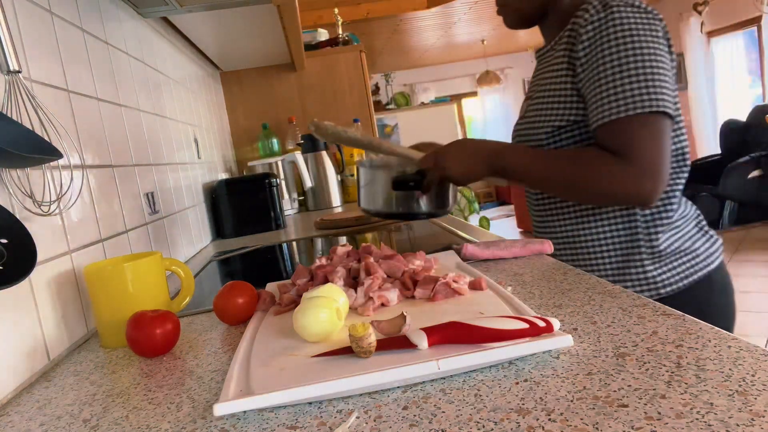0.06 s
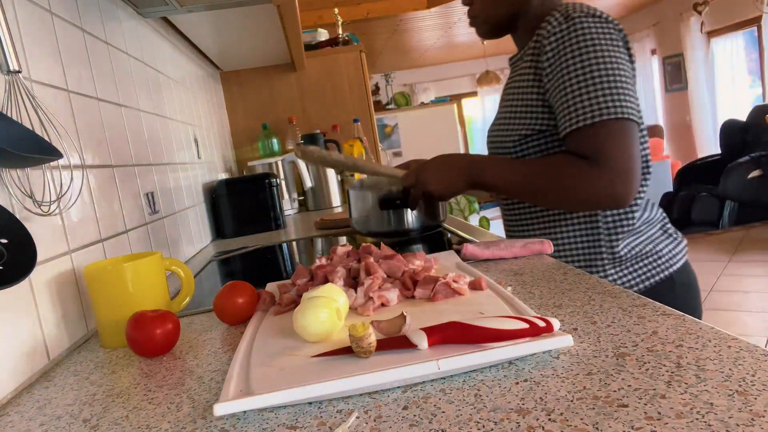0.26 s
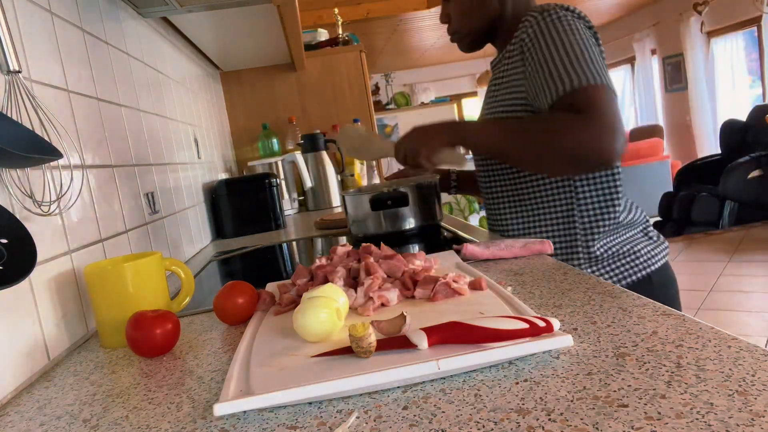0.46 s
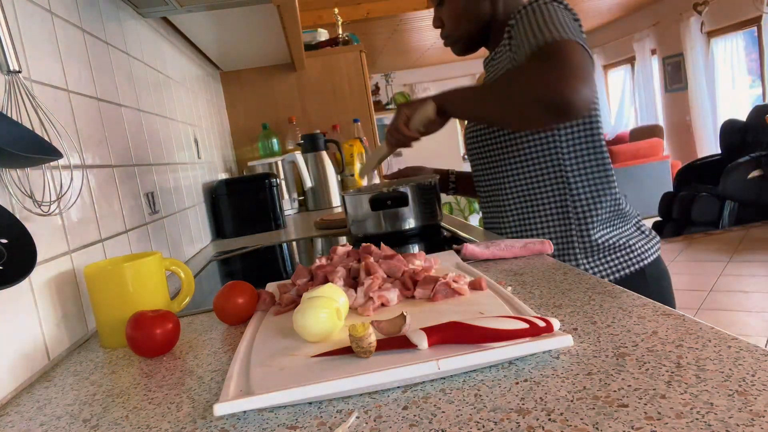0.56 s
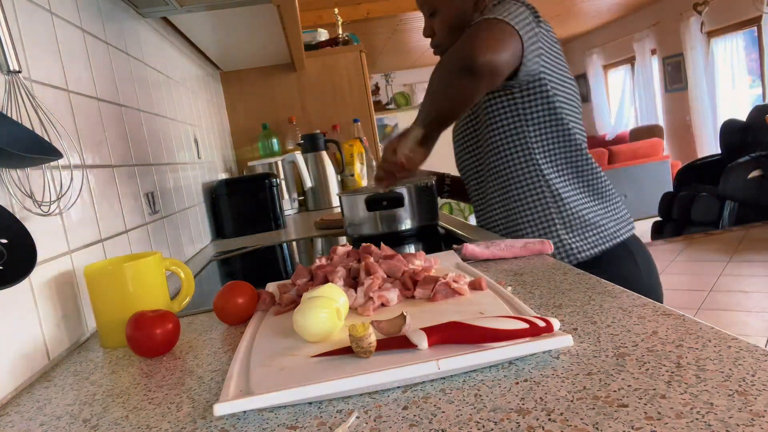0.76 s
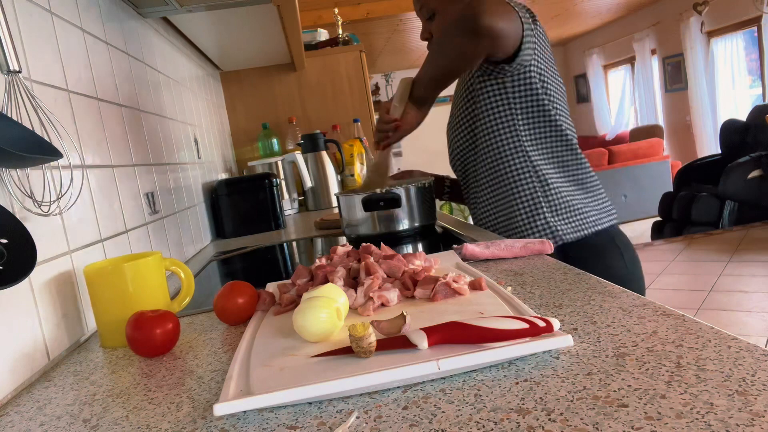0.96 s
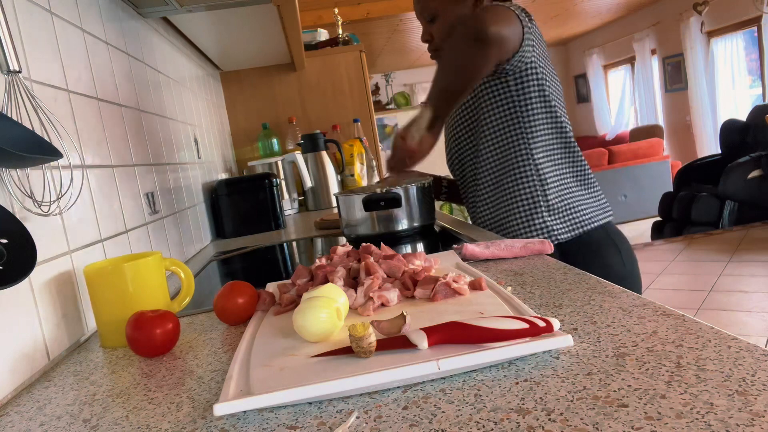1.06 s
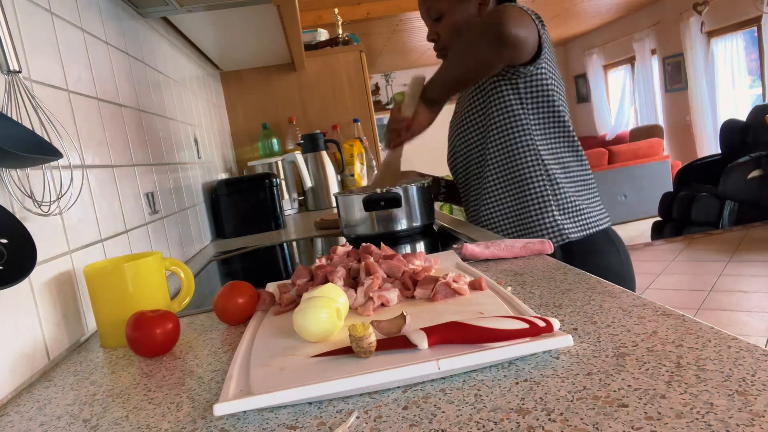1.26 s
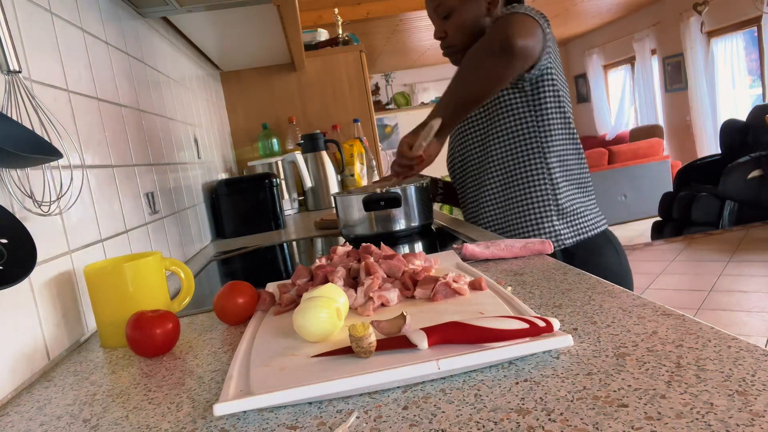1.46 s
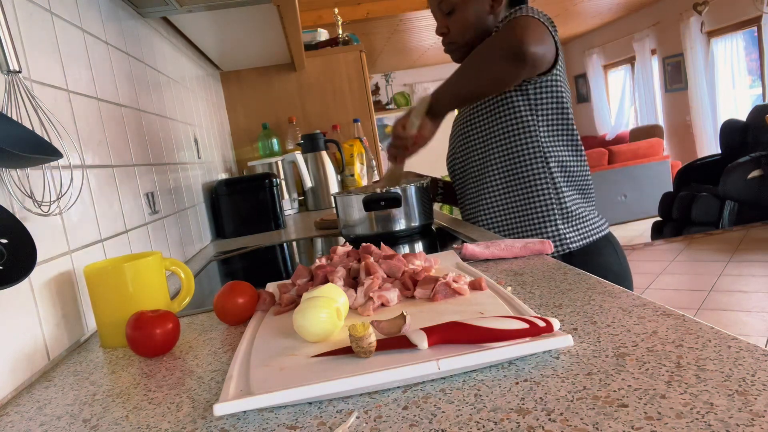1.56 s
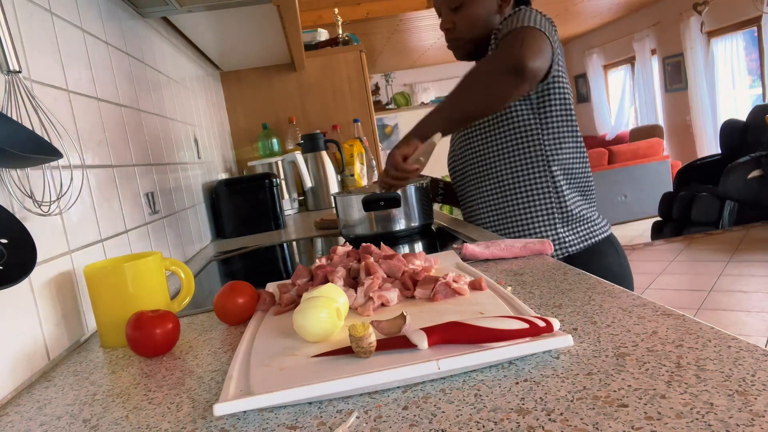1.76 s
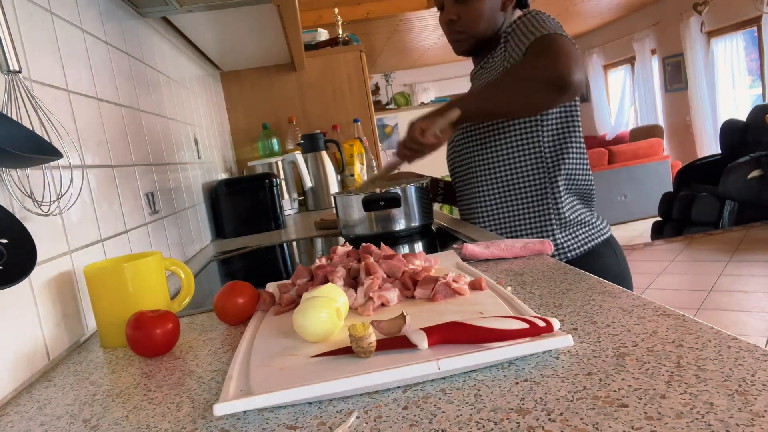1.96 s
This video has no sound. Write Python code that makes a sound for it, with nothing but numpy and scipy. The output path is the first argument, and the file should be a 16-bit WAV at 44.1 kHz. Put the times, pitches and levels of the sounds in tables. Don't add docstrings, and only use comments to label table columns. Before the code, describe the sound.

A full steel pot lands on a glass hob with a hard clattering clank, rocks and settles with a low boom, then a wooden spoon knocks and scrapes through stiff food; close phone microphone, tiled kitchen.

```python
import sys
import numpy as np
from scipy import signal
from scipy.fft import rfft, irfft
from scipy.io import wavfile
from scipy.ndimage import uniform_filter1d

SR = 44100
rng = np.random.default_rng(int(sys.argv[2]) if len(sys.argv) > 2 else 0)


def rack_gain(trim_db):
    fader = np.asarray(trim_db, float)
    return 10 ** (fader / 20)


def master(y):
    cut = np.clip(np.atleast_2d(y).T, -1, 1)
    pcm = np.round(cut * 32767)
    wavfile.write(sys.argv[1], SR, pcm.astype(np.int16))


N = 88200
T = np.arange(N) / SR
F = np.arange(N // 2 + 1) * SR / N + 1e-3


def unit(x):
    return x / np.sqrt(np.mean(x ** 2))


def colour(points):
    hz, db = np.transpose(points)
    gain = rack_gain(np.interp(np.log(F), np.log(hz), db))
    return unit(irfft(rfft(rng.standard_normal(N)) * gain, N))


def walk(rate_hz):
    k = int(SR / rate_hz)
    smooth = uniform_filter1d(rng.standard_normal(N), k)
    return unit(uniform_filter1d(smooth, k))


def fade(start_s, t60_s):
    return (T >= start_s) * np.exp(-np.log(1000) * np.maximum(T - start_s, 0) / t60_s)


def burst(start_s, t60_s):
    push_s = .0006
    return fade(start_s, t60_s) * (1 - fade(start_s, np.log(1000) * push_s))


def ring(modes, start_s, db, push_s, chance):
    detune, scatter_db = .008, 1.5
    m, i = np.array(modes), min(int(start_s * SR) + 1, N)
    t = T[i:i + SR // 2] - start_s
    hz = m[:, :1] * (1 + detune * chance[:len(m), None])
    level = rack_gain(db + m[:, 1:2] + scatter_db * chance[-len(m):, None])
    contact = (1 + (hz[0] * push_s) ** 2) / (1 + (hz * push_s) ** 2)
    decay = np.exp(-np.log(1000) * t / m[:, 2:])
    y = np.sum(level * contact * decay * np.sin(2 * np.pi * hz * t), axis=0)
    out = np.zeros(N)
    out[i:i + len(t)] = y * (1 - np.exp(-t / push_s)) ** 2
    return out


def ports(x, lag_s, pan_db, other=0, wide=0, turn_rad=0, turn_hz=395):
    wide_above_hz = 250
    side = np.array([[1], [-1]])
    phase = np.pi * F * lag_s + turn_rad * F ** 2 / (F ** 2 + turn_hz ** 2)
    shared = rfft(x) * np.exp(-1j * phase * side)
    unrelated = side * wide * rfft(other + 0 * x) * F ** 2 / (F ** 2 + wide_above_hz ** 2)
    return irfft((shared + unrelated) * rack_gain(side * pan_db / 2), N)


# f/Hz, width/Hz, boost/dB
RESONANCES = [(1255, 190, 10), (1750, 90, 6), (2650, 180, 7.5), (3450, 150, 5), (4340, 380, 7),
              (6150, 300, 4), (8500, 300, 3), (10100, 400, 3), (11720, 1000, 4.5)]


def patchy(points):
    pair = np.array([colour(points), colour(points)])
    spectrum, out = rfft(pair), pair
    for hz, width_hz, db in RESONANCES:
        band = irfft(spectrum / (1 + (2 * (F - hz) / width_hz) ** 2), N)
        out = out + (rack_gain(db + 3.5 * walk(9)) - 1) * band
    return unit(out)


# f/Hz, level/dB
HUM_COLOUR = [(25, 7), (60, 14.5), (170, 6.5), (600, -9), (1250, -6.5), (4000, -10.5), (8000, -16.5),
              (16000, -110)]


def hum():
    a, b = rack_gain(-59 + 0.13 * walk(8.9)) * patchy(HUM_COLOUR)
    return ports(a, 0, .9, b, wide=1)


def sparks():
    per_s, low_hz, high_hz, t60_s = 260, 7500, 13500, .035
    out, t = np.zeros((2, N + SR // 20)), T[:SR // 20]
    swell = fade(0, t60_s)[:len(t)] * np.tanh(t / .002)
    for when, pitch, size, pan in rng.random((int(per_s * N / SR), 4)):
        hz = low_hz + pitch * (high_hz - low_hz)
        level = rack_gain(-13.5 - 4 * np.log(size + 1e-3))
        ping = level * swell * np.sin(2 * np.pi * hz * t)
        start = int(when * N)
        out[:, start:start + len(t)] += ping * np.array([[np.cos(pan * np.pi)], [np.sin(pan * np.pi)]])
    return out[:, :N]


# t/s, level/dB
SCRAPE_EFFORT = [(0, -73), (0.198, -73), (.45, -64.5), (.62, -68), (.69, -58), (.735, -53.5),
                 (0.748, -45.5), (.76, -58), (.79, -60), (.93, -59.5), (.98, -52), (1.10, -52.5),
                 (1.22, -60.5), (1.401, -54.5), (1.521, -64.5), (1.66, -57.5), (1.85, -59), (2, -58.5)]
# f/Hz, level/dB
DRAG_COLOUR = [(100, 7.5), (400, 1), (650, -6.5), (1300, -5.5), (4500, -3.5), (8000, -4.5), (12000, -8),
               (16000, -15.5)]


def scrape():
    t, db = np.transpose(SCRAPE_EFFORT)
    effort = rack_gain(np.interp(T, t, db) + 1 + .9 * walk(120))
    a, b = effort * patchy(DRAG_COLOUR)
    return effort * sparks() + ports(a, 0, .9, b, wide=1)


# t/s, deep level/dB, upper level/dB
WEIGHT_SHIFTS = [(.0, -52, -54), (0.12, -46, -68), (0.244, -37, -36), (0.339, -19.5, -19),
                 (0.443, -42, -40), (.53, -28.5, -50), (0.74, -23, -31), (0.819, -23, -32),
                 (0.968, -36.5, -65), (1.07, -56, -47), (1.19, -49, -41), (1.299, -64, -55),
                 (1.438, -59, -60), (1.617, -32, -38), (1.660, -19, -26), (1.739, -18.5, -29),
                 (1.828, -36.5, -39), (1.986, -28, -20.5)]
# f/Hz, level/dB, t60/s
FLOOR_MODES = [(55.26, -2, 0.3), (81, 6.5, 0.13), (100.3, 10, 0.29)]


def shifts():
    push_s, out = 0.023, np.zeros(N)
    for t, deep_db, upper_db in WEIGHT_SHIFTS:
        chance = rng.standard_normal(6)
        out += ring(FLOOR_MODES[:1], t, deep_db, push_s, chance)
        out += ring(FLOOR_MODES[1:], t, upper_db - 7, push_s, chance[1:])
    return out


def blows(table, body):
    crack_t60_s, rattle_t60_s = 0.06, 0.23
    rattle = rack_gain(-12.5 + 1.2 * walk(150))
    tone, noise = np.zeros(N), np.zeros((2, N))
    for t, ring_db, crack_db, contact_ms in table:
        tone += ring(body, t, ring_db, contact_ms / 1000, rng.standard_normal(28))
        noise += rack_gain(crack_db) * np.array([burst(t, crack_t60_s), rattle * burst(t, rattle_t60_s)])
    return tone, noise


# t/s, ring level/dB, crack level/dB, contact/ms
BASE_STRIKES = [
    (.2270, -38.5, -51, 0.19),
    (.2335, -9, -17.5, 0.35),
    (.2364, -10, -38.5, 0.66),
    (.2505, -12.5, -21, 0.31),
    (.2620, -18, -52, 0.82),
    (.2860, -34, -52, 2.2),
]
# f/Hz, level/dB, t60/s
HOB_MODES = [(330, -9, 0.036), (343.2, 1, 0.041), (471, -15.5, 0.12), (547, -5, 0.042), (708, -28, 0.14),
             (750, -10.5, 0.024), (822, -0.5, 0.044), (1080, -27, 0.077), (1213, 4, 0.023),
             (1304, -2, 0.025), (1310, -16, 0.015), (1570, -10, 0.018), (2380, 1, 0.01),
             (3850, 5.5, 0.0098)]


def clanks():
    return blows(BASE_STRIKES, HOB_MODES)


# f/Hz, level/dB
CRACK_COLOUR = [(600, 13), (1500, 10), (2500, -7.5), (4000, -3.5), (5200, -7.5), (8000, -13), (12000, -18),
                (16000, -26.5)]
# f/Hz, level/dB
RATTLE_COLOUR = [(300, -11.5), (800, 4.5), (1400, -3), (2500, -2), (4200, -5), (7000, -14), (10000, -35),
                 (16000, -58)]


def contact_noise(hard, soft):
    noise = np.array([colour(CRACK_COLOUR), colour(RATTLE_COLOUR)])
    muffled = signal.lfilter(*signal.butter(2, 5860, fs=SR), soft * noise)
    return np.sum(hard * noise + muffled, axis=0)


# t/s, level/dB, f/Hz, t60/ms
GRIT_PINGS = [(0.234, -24, 3800, 14), (0.236, -29, 5400, 8), (0.2516, -12, 4060, 9.7),
              (.2550, -19, 5770, 9.4), (0.258, -35, 4430, 18), (.2380, -30, 3000, 15),
              (0.255, -20, 2900, 15), (.2545, -33, 7000, 6), (0.3272, -21, 3200, 8), (0.328, -37, 4600, 13),
              (.3380, -14, 2510, 14.7), (0.3413, -30, 6050, 22), (.3500, -41, 4540, 4.6),
              (.4330, -35, 3900, 20), (.6490, -40, 7960, 8), (.6480, -32, 2370, 19), (.6490, -39, 4120, 15),
              (.6515, -23, 580, 46), (0.743, -25, 4570, 6.1), (0.747, -40, 6800, 8.8),
              (.9400, -45.5, 1940, 21), (0.945, -46, 3320, 15.8)]


def ticks():
    out = np.zeros(N)
    for t, db, hz, t60_ms in GRIT_PINGS:
        out += rack_gain(db) * burst(t, t60_ms / 1000) * np.sin(2 * np.pi * hz * (T - t))
    return out


# t/s, level/dB, plate f/Hz, t60/s
PLATE_BOOMS = [(.241, -11, 173, 0.071), (0.251, -15, 162.7, 0.061), (.272, -13, 114, 0.052),
               (0.306, -30, 169, 0.046), (0.339, -8, 158, 0.061), (.372, -25, 179.4, 0.049),
               (0.397, -30.5, 132, 0.084), (0.433, -29.5, 117, 0.062), (0.473, -35, 157, .09),
               (0.531, -36, 110, 0.051), (0.6528, -11, 139.6, 0.079), (0.685, -25.5, 137, 0.07),
               (0.741, -17, 159.7, 0.061), (0.798, -40, 136, .09), (0.944, -28, 156.7, 0.077),
               (1.058, -56, 129.4, 0.11), (1.254, -32.5, 170.5, 0.071), (1.287, -38, 166, .09),
               (1.349, -61, 162, .09), (1.610, -35, 181, 0.12), (1.672, -17.5, 151.5, 0.071),
               (1.712, -35, 156, 0.065), (1.985, -31.5, 168.5, 0.053)]
# pitch ratio, level/dB
PLATE_PARTIALS = [(0.998, 9), (1.17, -29)]
# f/Hz, level/dB, t60/s
CABINET_MODES = [(85.4, -4, 0.051), (108.74, -12.5, 0.34), (135.5, -29.5, 0.45)]


def booms():
    out = np.zeros(N)
    for t, db, hz, t60_s in PLATE_BOOMS:
        plate = [(hz * ratio, level_db, t60_s) for ratio, level_db in PLATE_PARTIALS]
        out += ring(plate + CABINET_MODES, t, db, 0.006, rng.standard_normal(10))
    return out


# t/s, ring level/dB, crack level/dB, contact/ms
EDGE_STRIKES = [(.3265, -24.5, -17, 0.27), (.3319, -8.5, -36.5, 0.82), (.3398, -16.5, -36.5, 0.34),
                (.3490, -31, -62, 0.82), (.3640, -17, -58, 1), (.3820, -28, -47.5, 0.71),
                (.4010, -53, -35.5, 1), (.4180, -61, -59, 1), (.4313, -52, -30.5, 0.74),
                (.7310, -29, -32, .8), (.7390, -46, -36.5, .8), (.7436, -24, -45, 1)]
# f/Hz, level/dB, t60/s
EDGE_MODES = [(303, -16.5, 0.082), (364.4, 1, 0.047), (446, -16.5, 0.04), (580, -5.5, 0.022),
              (756, -8, 0.033), (883, -6.5, 0.034), (978, 0, 0.03), (1246, -5, 0.035), (1365, 3, 0.018),
              (1630, -12, .04), (2084, -6, 0.024), (2560, -1, 0.027), (3850, -7, 0.018), (4270, -20, 0.013)]


def rocks():
    return blows(EDGE_STRIKES, EDGE_MODES)


# t/s, ring level/dB, crack level/dB, contact/ms
SPOON_BLOWS = [(.6468, -30, -31.5, 0.49), (.6520, -17.5, -55, 0.59), (.9411, -39.5, -46, 3),
               (1.0600, -48.5, -90, 2.5), (1.2410, -26.5, -58, 4.3), (1.3550, -56, -67, 5.8),
               (1.6010, -35.5, -89, 3.6), (1.6625, -31, -52, 0.57), (1.6790, -40.5, -55, 1),
               (1.6934, -34.5, -45.5, 0.4), (1.7100, -47.5, -61, 0.43), (1.7300, -50, -51, 6.3),
               (1.8450, -61, -67, 4.8), (1.9793, -35.5, -49, 4.9)]
# f/Hz, level/dB, t60/s
POT_MODES = [(260, -24, 0.029), (306.8, 3, 0.08), (361.9, -21.5, 0.43), (425, -20, 0.24),
             (585.6, -6, 0.037), (610, 1.5, 0.011), (752, -15, 0.091), (849, -4.5, 0.036), (902, -9, 0.035),
             (1012, -14, 0.1), (1257, -16.5, 0.19), (1785, -9.5, 0.027), (2306, -3.5, 0.018)]


def thumps():
    return blows(SPOON_BLOWS, POT_MODES)


# t/s, length/s, from f/Hz, to f/Hz, level/dB, third partial level/dB
WALL_SQUEAK = (1.84, .09, 432, 375, -58, -9)


def squeak():
    start_s, length_s, from_hz, to_hz, db, third_db = WALL_SQUEAK
    u = np.clip((T - start_s) / length_s, 0, 1)
    phase = 2 * np.pi * np.cumsum(from_hz + (to_hz - from_hz) * u ** 2) / SR
    tone = np.sin(phase) + rack_gain(third_db) * np.sin(3 * phase)
    return rack_gain(db + 2 * walk(66)) * np.sin(np.pi * u) ** .5 * tone


def room_tail():
    gap_s, low_t60_s, high_t60_s = 0.0061, 0.57, .4
    low = signal.lfilter(*signal.butter(1, 900, fs=SR), rng.standard_normal(N))
    return low * fade(gap_s, low_t60_s) + 0.46 * rng.standard_normal(N) * fade(gap_s, high_t60_s)


def room(x):
    ir = ports(room_tail(), 0, 0, room_tail(), wide=1)[:, :SR]
    ir = ir / np.sqrt(np.sum(ir ** 2) / 2)
    return rack_gain(-12.5) * signal.fftconvolve(x[None], ir, axes=1)[:, :N]


def scene():
    clank, crack = clanks()
    rock, clack = rocks()
    thump, tap = thumps()
    tone = shifts() + clank + booms() + rock + thump + squeak()
    snap = contact_noise(crack + clack, tap) + ticks()
    other = contact_noise(crack + clack, tap)
    near = ports(tone, .00001, .9, turn_rad=0.92, turn_hz=395)
    near = near + ports(snap, .00001, .9, other, wide=0.48, turn_rad=-1.01, turn_hz=1410)
    return hum() + scrape() + near + room(tone + snap)


def band_limit(x):
    return signal.sosfilt(signal.butter(12, 15870, fs=SR, output="sos"), x)


def record(dry):
    low_cut = signal.butter(2, 46.4, "high", fs=SR, output="sos")
    top_cut = signal.ellip(10, .2, 70, 15750, fs=SR, output="sos")
    heard = signal.sosfilt(np.vstack([low_cut, top_cut]), dry)
    ceiling = .9
    mix = ceiling * np.tanh(heard / ceiling)
    return band_limit(mix)


dry = scene()
out = record(dry)
master(out)
```